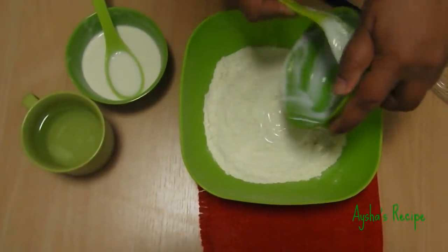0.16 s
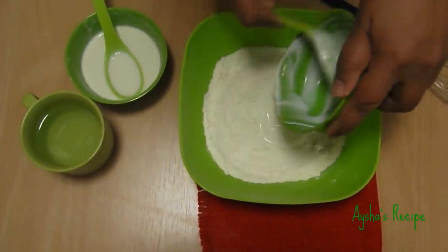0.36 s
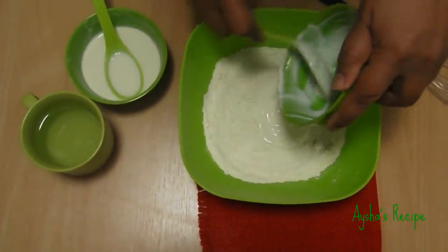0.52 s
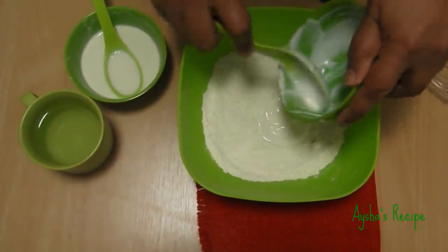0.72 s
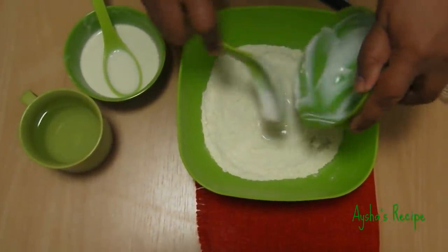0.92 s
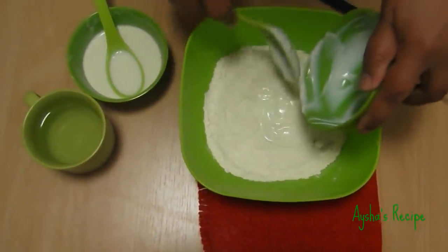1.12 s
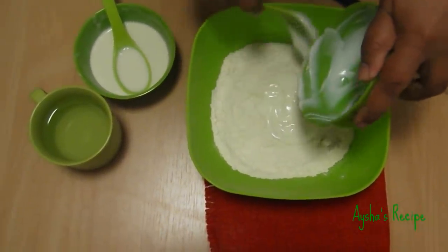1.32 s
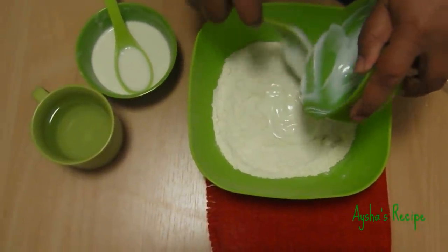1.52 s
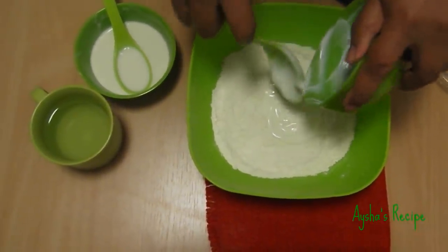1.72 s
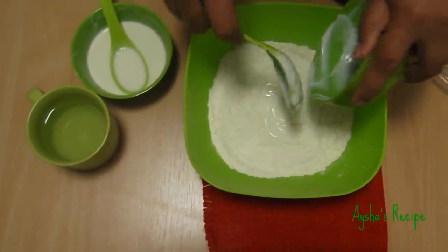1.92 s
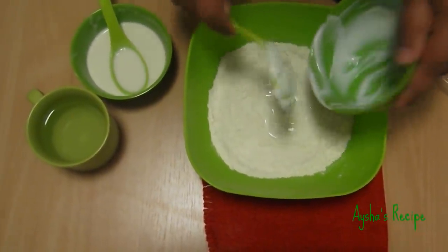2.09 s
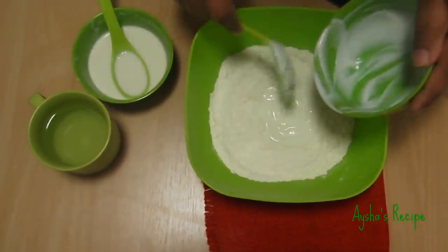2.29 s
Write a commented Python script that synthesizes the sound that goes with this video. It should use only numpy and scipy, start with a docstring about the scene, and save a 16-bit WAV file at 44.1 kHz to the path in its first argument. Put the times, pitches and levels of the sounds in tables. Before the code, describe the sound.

A plastic spoon knocks a small plastic bowl three times and scrapes out wet yogurt

```python
"""Spoon and yogurt bowl, small kitchen

A plastic spoon knocks three times on a small hand-held plastic bowl, ringing its damped modes, and
scrapes out yogurt: stick-slip clicks drive resonances of the wall and a gliding hollow.
Decaying tones make two wet plops; filtered noise and a low tone make the soft bumps of the hands.
The room rings briefly in decaying noise. Behind it: a faint rattling whirr of unevenly ticking noise,
a low rumble, and the hiss and thin whine of the microphone."""
import sys
import numpy as np
from scipy import signal
from scipy.fft import rfft, irfft
from scipy.io import wavfile

SR = 44100
rng = np.random.default_rng(int(sys.argv[2]) if len(sys.argv) > 2 else 0)


def inscribe(sig):
    """Save sig as 16-bit PCM at rate SR to the path in sys.argv[1].

    A 1-D sig is mono; a 2-D sig holds one channel per row.
    Samples are clipped to [-1, 1] before scaling.
    """
    pcm = np.round(np.clip(np.atleast_2d(sig).T, -1, 1) * 32767)
    wavfile.write(sys.argv[1], SR, pcm.astype(np.int16))


N = 103635

# reverberation of the kitchen, by band [low edge f/Hz, high edge f/Hz, 60 dB decay t/s, level/dB]
KITCHEN_BANDS = [(150, 720, 0.38, 12), (950, 2460, 0.13, 8), (1920, 3060, 0.36, 8.5), (4160, 5800, 0.32, 2),
                 (6600, 25000, 0.29, -1)]
ROOM_DELAY_S, SCRAPE_ROOM_DB, PLOP_ROOM_DB = 0.0045, -9.5, -16

# spectrum of rumble and hiss [f/Hz, level/dB]
FLOOR_SPECTRUM = [(10, 6), (32, -1), (50, -4.5), (75, -13), (105, -19.5), (145, -17.5), (220, -22.5),
                  (400, -26), (750, -27), (3200, -36), (7000, -32), (16000, -33)]
FLOOR_DB = -39.5
WHINE_HZ, WHINE_DB = 11362, -57

# resonances of the rattling whirr [f/Hz, width/Hz (doubled in each of two passes), level/dB]
WHIRR_MODES = [(961, 103, -4), (1576, 158, -2), (2102, 203, 1.5), (2528, 96, 3), (3990, 113, -1.5),
               (4304, 417, -6), (4990, 1060, -12.5), (7820, 1000, -13)]
WHIRR_DB, WHIRR_STEADY = -45, 0.45
RATTLE_PER_S, RATTLE_JITTER, RATTLE_SPREAD_DB, RATTLE_DECAY_S = 90, 0.35, 3.5, 0.0017

# dull bumps of the hands on the bowl [start t/s, decay t/s, rub level/dB, boom level/dB]
HAND_BUMPS = [(0.491, 0.056, -40, -39.5), (0.601, 0.047, -37.5, -32.5)]
# spectrum of the rub [f/Hz, level/dB]
RUB_SPECTRUM = [(25, 3), (60, 8), (100, -11), (170, -2.5), (340, -8), (600, -17), (2000, -48)]
BUMP_RISE_S, BOOM_HZ = 0.004, 138.2

# wet plops of the yogurt [centre t/s, f/Hz, decay to either side t/s, level/dB]
YOGURT_PLOPS = [(0.845, 1010, 0.0024, -27), (1.157, 2570, 0.0022, -32)]

# modes of the bowl [f/Hz, 60 dB decay t/s, level/dB at the spot of the first, second, third knock]
BOWL_MODES = [(595, 0.025, -22, -44, -27), (1083, 0.023, -7, -11, -19), (1380, 0.005, -1.5, -7, -3.5),
              (1670, 0.011, -14.5, -5, -10.5), (2044, 0.014, -30, -13.5, -39),
              (2607, 0.027, -15, -19, -25.5), (2830, 0.011, -10, -8, -26), (3075, 0.012, -13, -18, -28),
              (3490, 0.019, -27.5, -20, -30), (4570, 0.015, -10, -10, -54), (5060, 0.0057, -8, -17, -31),
              (5550, 0.012, -20, -18, -35), (6060, 0.016, -22, -33, -47), (7180, 0.011, -17.5, -25, -28),
              (8330, 0.027, -32, -30, -24.5)]
# brief swell of the bowl's ring [start t/s, rise t/s, hold t/s, step back t/s (negative), level/dB]
# the sound ends at rise + hold + step back, here half way up the rise
RING_SWELL = (1.5, 0.08, 0.17, -0.21, -26)

# strokes of the spoon along the wall
# [start t/s, rise t/s, hold t/s, fall t/s, body level/dB, grit level/dB, place 0-1, grit top f/Hz]
SPOON_STROKES = [(0.349, 0.025, 0.025, .008, -43.5, -40, 1, 12600),
                 (0.811, 0.027, 0.0094, 0.016, -50.5, -44.5, 0.5, 14000),
                 (1.302, 0.018, 0.054, 0.025, -41, -58, 0, 8200),
                 (1.373, 0.015, 0.069, 0.032, -36, -41.5, 0.12, 8850),
                 (1.417, 0.006, 0.028, 0.022, -52, -49.5, 0, 8600),
                 (1.475, 0.041, 0.062, 0.024, -44.5, -44.5, 0.2, 11200),
                 (1.549, 0.048, 0.038, 0.069, -33.5, -37, 0.8, 13000),
                 (1.603, 0.031, 0.046, 0.035, -35.5, -38, 1, 9200),
                 (1.708, 0.025, 0.054, 0.018, -44.5, -51, 0.6, 8100),
                 (1.796, 0.0007, 0.0024, 0.0077, -34, -45, 0.7, 8100)]
# resonances of the wall under the spoon [f/Hz, width/Hz, level/dB at place 0, level/dB at place 1]
WALL_MODES = [(387, 110, -0.5, -16), (620, 46, -35, -20), (703, 39, 5, -7.5), (843, 48, -4, 11),
              (983, 130, 10.5, -11), (1178, 30, -14, 10), (1377, 150, -9, 7.5), (1453, 38, 9, -6),
              (1730, 45, -29, -1), (2453, 59, 12.5, 14)]
# tone of the clicks that drive the wall [f/Hz, level/dB]
WALL_DRIVE = [(250, -4.5), (450, 7.5), (1750, 6.5), (2300, -9), (8000, -26)]
# spectrum of the bright grit [f/Hz, level/dB]
GRIT_SPECTRUM = [(1200, -44), (2100, -16), (2500, 5), (3000, -2.5), (3550, 7.5), (4600, -2.5), (5500, 3.5),
                 (6100, -2.5), (6950, 6), (7600, -1), (8150, 9.5), (9000, -4), (9750, 3), (10700, -2.5),
                 (13000, -3), (16000, -9)]
# resonance of the hollow between spoon and wall, rising and then sinking [t/s, f/Hz]
HOLLOW_GLIDE = [(1.5, 1415), (1.585, 1720), (1.625, 1650), (1.675, 1210)]
HOLLOW_WIDTH_HZ, HOLLOW_DB = 58, -6
SLIPS_PER_S, SLIP_SPREAD_DB, SLIP_STEADY = 8000, 1, 0.76
# the spoon catches and lets go
JUDDER_PER_S, JUDDER_JITTER, JUDDER_SPREAD_DB, JUDDER_DECAY_S = 270, 0.25, 1.5, 0.00034

# knocks of the spoon [start t/s, ring level/dB, crack level/dB, level into the room/dB]
KNOCKS = [(0.2172, 2.14, -10.5, -14.5), (0.4002, 1.96, -13.5, -14), (1.3121, -4, -20.5, -15)]
# spectrum of the contact noise [f/Hz, level/dB]
CRACK_SPECTRUM = [(300, -5.5), (800, 2), (1500, 6), (2250, -1.5), (5000, 2.5), (9000, -2), (12000, -9.5),
                  (16000, -24)]
CRACK_DECAY_S = 0.0023
RADIATE_HZ = 328  # the small bowl radiates little below this

CLIP_LEVEL, TOP_HZ = 1, 16000


def undb(db):
    """Decibels to gain."""
    return 10 ** (np.asarray(db) / 20)


def unit(x):
    """Scale to rms 1."""
    return x / np.sqrt(np.mean(x ** 2))


def since(start):
    """Seconds since start, zero before it."""
    return np.maximum(np.arange(N) - round(start * SR), 0) / SR


def decay60(t, t60):
    """Exponential decay that falls 60 dB in t60 seconds."""
    return np.exp(-np.log(1000) * t / t60)


def swell(start, rise, hold, fall):
    """Pressure that rises, holds and falls."""
    return np.interp(since(start), np.cumsum([0, rise, hold, fall]), [0, 1, 1, 0])


def colour(x, points):
    """Filter by a curve of (Hz, dB) points, straight over log frequency."""
    hz, db = np.array(points, float).T
    f = np.maximum(np.fft.rfftfreq(len(x), 1 / SR), 1)
    gain = undb(np.interp(np.log(f), np.log(hz), db))
    return irfft(rfft(x) * gain, len(x))


def resonate(x, hz, width):
    """Two-pole resonance, gain 1 at the centre."""
    return signal.lfilter(*signal.iirpeak(hz, hz / width, fs=SR), x)


def glide(x, curve, width):
    """Resonance whose centre follows a curve of (s, Hz) points."""
    centre_hz = np.interp(since(0), *np.array(curve).T)
    turn = np.exp(2j * np.pi * np.cumsum(centre_hz) / SR)
    # shift the centre to 0 Hz, smooth there, shift back
    smooth = signal.lfilter([1], [1, -np.exp(-np.pi * width / SR)], x / turn)
    return np.real(turn * smooth)


def chatter(per_s, jitter, spread_db, decay):
    """Envelope of unevenly spaced, quickly dying ticks."""
    gap, size = np.clip(rng.standard_normal((N // 50, 2)).T, -2, 2)
    at = (np.cumsum(np.exp(jitter * gap)) * SR / per_s).astype(int)
    ticks = np.bincount(at[at < N], undb(spread_db * size[at < N]), N)
    return signal.lfilter([1], [1, -np.exp(-1 / (decay * SR))], ticks)


def kitchen(x):
    """Diffuse reflections that die away band by band."""
    t = np.arange(SR // 2) / SR
    tail = 0
    for lo_hz, hi_hz, t60, db in KITCHEN_BANDS:
        edges = [lo_hz, min(hi_hz, SR / 2 - 1)]
        band = signal.butter(2, edges, "band", fs=SR, output="sos")
        noise = signal.sosfilt(band, rng.standard_normal(len(t)))
        tail = tail + undb(db) * noise * decay60(t, t60)
    tail = tail * (t > ROOM_DELAY_S)
    return signal.fftconvolve(x, tail / np.sqrt(np.sum(tail ** 2)))[:N]


def floor():
    """Low rumble and even hiss as shaped noise, and a thin electrical whine as a sine."""
    whine = undb(WHINE_DB) * unit(np.sin(2 * np.pi * WHINE_HZ * since(0)))
    noise = unit(colour(rng.standard_normal(N), FLOOR_SPECTRUM))
    return undb(FLOOR_DB) * noise + whine


def whirr():
    """A faint machine, perhaps a fan: noise with uneven ticks excites a few resonances."""
    ticks = chatter(RATTLE_PER_S, RATTLE_JITTER, RATTLE_SPREAD_DB, RATTLE_DECAY_S)
    drive = rng.standard_normal(N) * (WHIRR_STEADY + ticks)
    ring = 0
    for hz, width, db in WHIRR_MODES:
        once = resonate(drive, hz, 2 * width)
        ring = ring + undb(db) * resonate(once, hz, 2 * width)
    return undb(WHIRR_DB) * unit(ring)


def handling():
    """Soft bumps as the bowl is turned in the hand: a dull rub and one low boom."""
    out = 0
    rub = unit(colour(rng.standard_normal(N), RUB_SPECTRUM))
    for start, decay, rub_db, boom_db in HAND_BUMPS:
        t = since(start)
        push = np.exp(-t / decay) * (1 - np.exp(-t / BUMP_RISE_S))
        boom = np.sin(2 * np.pi * BOOM_HZ * t)
        out = out + push * (undb(rub_db) * rub + undb(boom_db) * boom)
    return out


def yogurt():
    """Small air pockets plop in the yogurt: tones that swell and die exponentially."""
    out = 0
    for at, hz, length, db in YOGURT_PLOPS:
        t = np.arange(N) / SR - at
        out = out + undb(db) * np.sin(2 * np.pi * hz * t) * np.exp(-np.abs(t) / length)
    return out + undb(PLOP_ROOM_DB) * kitchen(out)


def slips():
    """Dense stick-slip clicks of random sign, bunched by the spoon's quick judder."""
    judder = SLIP_STEADY + chatter(JUDDER_PER_S, JUDDER_JITTER, JUDDER_SPREAD_DB, JUDDER_DECAY_S)
    size = judder * undb(SLIP_SPREAD_DB * np.clip(rng.standard_normal(N), -2, 2))
    sign = np.sign(rng.standard_normal(N))
    return size * sign * (rng.random(N) < SLIPS_PER_S / SR)


def slide():
    """Light friction sets the bowl's modes singing in one brief swell that breaks off."""
    clicks = slips()
    ring = 0
    for k, (hz, t60, db, _, _) in enumerate(BOWL_MODES):
        width = np.log(1000) / (np.pi * t60)  # a longer ring is a narrower resonance
        ring = ring + (-1) ** k * undb(db) * np.sqrt(t60) * resonate(clicks, hz, width)
    start, rise, hold, step_back, level_db = RING_SWELL
    t = since(start)
    pressure = np.where(t <= rise + hold + step_back, t / rise, 0)
    return undb(level_db) * pressure * unit(ring)


def scrapes():
    """The spoon's slips drive the hollow and the wall, which rings by place, and add a bright grit."""
    out, clicks = 0, slips()
    grit = unit(colour(clicks, GRIT_SPECTRUM))
    drive = colour(clicks, WALL_DRIVE)
    rings = [resonate(drive, hz, width) for hz, width, _, _ in WALL_MODES]
    hollow = undb(HOLLOW_DB) * unit(glide(drive, HOLLOW_GLIDE, HOLLOW_WIDTH_HZ))
    for *shape, body_db, grit_db, place, top_hz in SPOON_STROKES:
        wall = 0
        for (_, _, *place_db), ring in zip(WALL_MODES, rings):
            wall = wall + undb(np.interp(place, [0, 1], place_db)) * ring
        body = unit(unit(wall) + hollow)
        top_cut = signal.butter(8, min(top_hz, SR / 2 - 1), fs=SR, output="sos")
        scratch = signal.sosfilt(top_cut, grit)
        pressure = swell(*shape)
        out = out + pressure * undb(body_db) * body
        out = out + pressure ** 2 * undb(grit_db) * scratch  # grit needs more pressure
    return out + undb(SCRAPE_ROOM_DB) * kitchen(out)


def taps():
    """Each knock cracks and rings the bowl's hand-damped modes, weighted by where it lands."""
    dry, send = 0, 0
    for spot, (start, ring_db, crack_db, room_db) in enumerate(KNOCKS):
        t = since(start)
        ring = 0
        for k, (hz, t60, *spots) in enumerate(BOWL_MODES):
            gain = (-1) ** k * undb(ring_db + spots[spot])
            ring = ring + gain * np.sin(2 * np.pi * hz * t) * decay60(t, t60)
        noise = unit(colour(rng.standard_normal(N), CRACK_SPECTRUM))
        crack = undb(crack_db) * noise * np.exp(-t / CRACK_DECAY_S) * (t > 0)
        dry = dry + ring + crack
        send = send + undb(room_db) * (ring + 2 * crack)  # the crack spreads more widely
    radiate = signal.butter(1, RADIATE_HZ, "high", fs=SR)
    return signal.lfilter(*radiate, dry + kitchen(send))


def scene():
    """Spoon, bowl and yogurt over the kitchen's background."""
    background = floor() + whirr()
    bowl = handling() + yogurt() + slide() + scrapes() + taps()
    return (background + bowl)[None]


def record(dry):
    """The recorder clips anything beyond full scale, then cuts the top steeply."""
    clipped = np.clip(dry, -CLIP_LEVEL, CLIP_LEVEL)
    return signal.sosfilt(signal.ellip(10, 0.1, 70, TOP_HZ, fs=SR, output="sos"), clipped)


dry = scene()
out = record(dry)
inscribe(out)
```